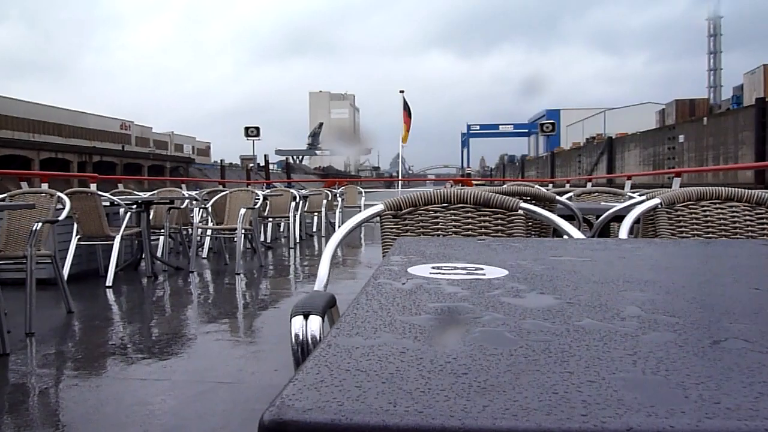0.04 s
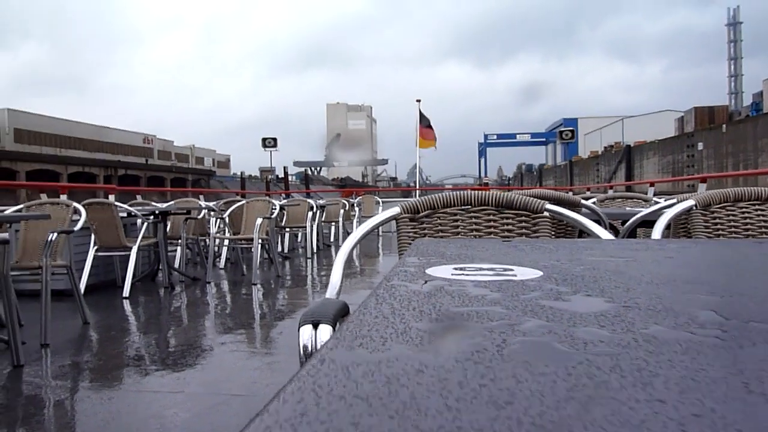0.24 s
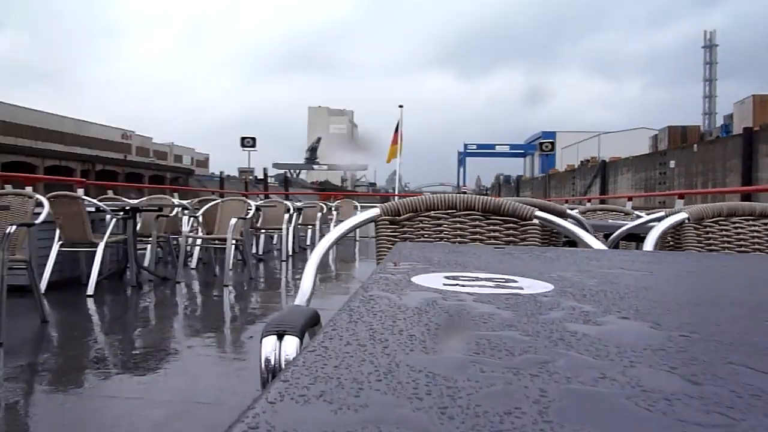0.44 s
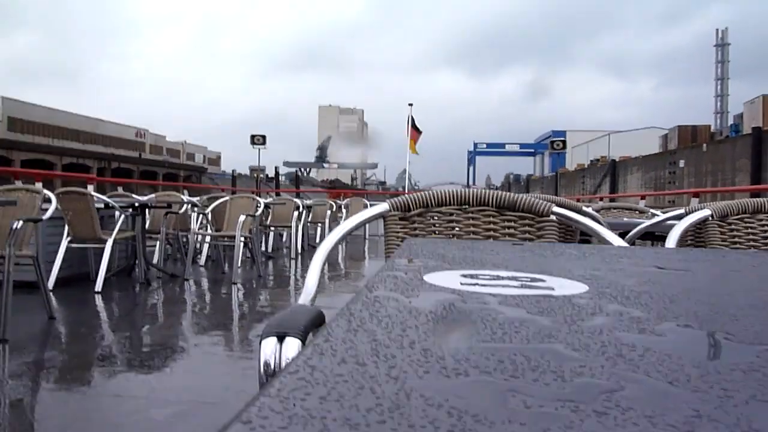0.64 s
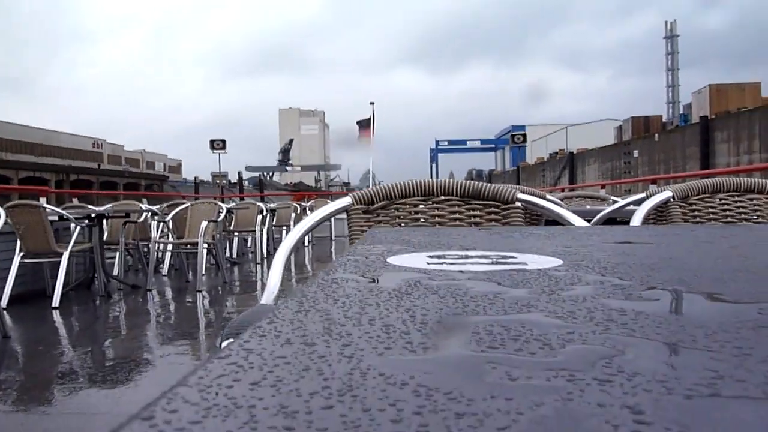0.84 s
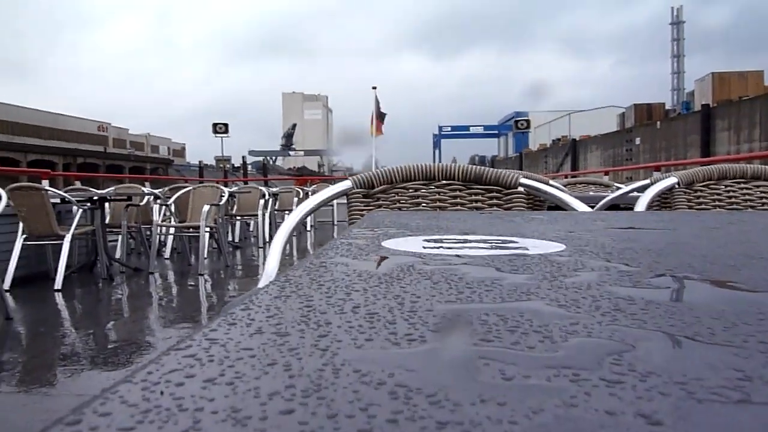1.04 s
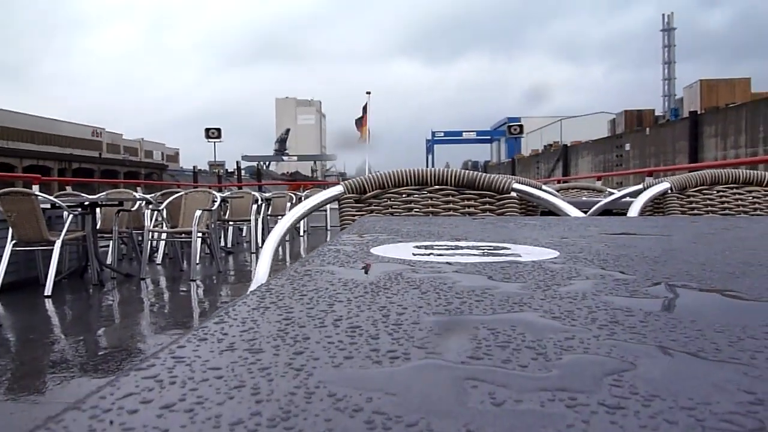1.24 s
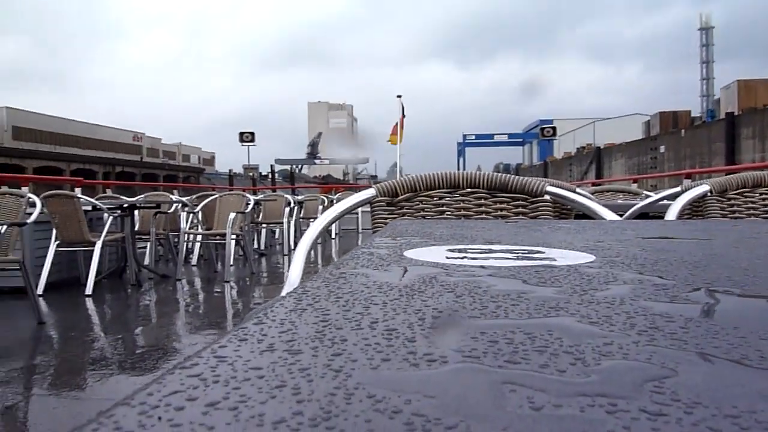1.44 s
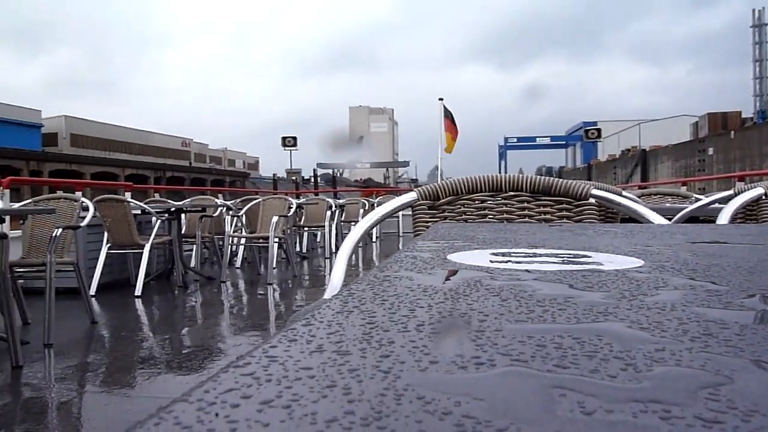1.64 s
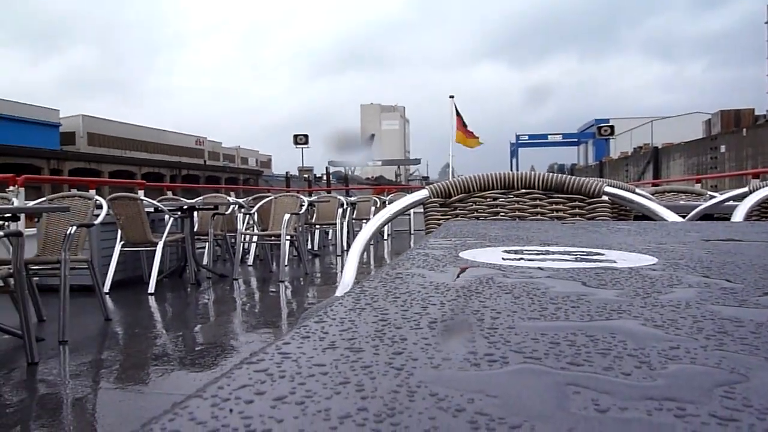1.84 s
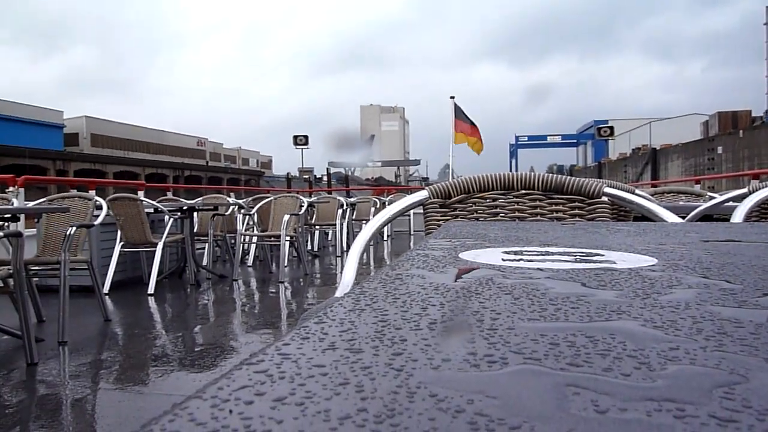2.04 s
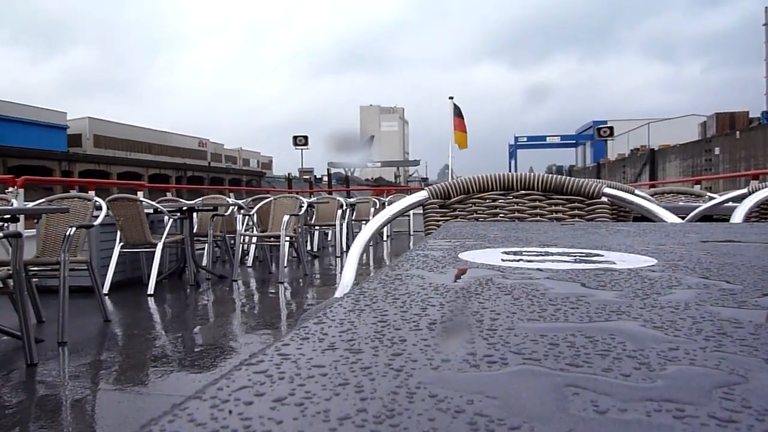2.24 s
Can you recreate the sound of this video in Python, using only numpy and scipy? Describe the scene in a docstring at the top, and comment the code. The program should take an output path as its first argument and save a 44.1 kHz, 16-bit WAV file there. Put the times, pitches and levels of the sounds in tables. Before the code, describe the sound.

Boat engine humming steadily on an open deck, with wet table scrapes and wind buffeting the microphone

```python
"""After a moment of silence the open deck of a tour boat cuts in: wavering engine tones, deck rumble, hissing wash.
At once the microphone is slid over a wet table: noise and random grit make the scrape, resonant bursts the ticks.
Then low thumps and bass noise make wind buffet mainly the right side, while the boat briefly sounds quieter.
A click, a duller rub and a faint ring follow, and near the end comes one short rising hoot, a tone with its octave."""
import sys
import numpy as np
from scipy.fft import rfft, irfft, next_fast_len
from scipy.io import wavfile
from scipy.ndimage import map_coordinates

SR = 44100
rng = np.random.default_rng(int(sys.argv[2]) if len(sys.argv) > 2 else 0)


def digitize_waveform(pressure):
    """Quantize a signal to 16-bit integers and store it at the path in sys.argv[1].

    Rows of a 2-D input are taken as channels; values are limited to [-1, 1].
    """
    field = np.atleast_2d(pressure).T
    bounded = np.clip(field, -1, 1)
    quanta = np.round(bounded * 32767).astype(np.int16)
    wavfile.write(sys.argv[1], SR, quanta)


N = 100592  # length in samples

FIRING_HZ = 77.6  # how often the engine fires


def amp(db):
    """Turn decibels into a gain."""
    return 10 ** (np.asarray(db) / 20)


def unit(x):
    """Scale a sound to an rms of 1."""
    return x / np.sqrt(np.mean(x ** 2) + 1e-20)


def pan(db):
    """Left and right gains that differ by db; above zero, the left is louder."""
    return amp(np.array([[db], [-db]]) / 2)


def along(points, hz):
    """Read a curve of (Hz, value) points on a logarithmic pitch axis."""
    point_hz, values = np.transpose(points)
    return np.interp(np.log(hz + 1), np.log(point_hz + 1), values)


def clock():
    """Time of every sample in seconds."""
    return np.arange(N) / SR


def curves(rows):
    """One curve over time for each column after the time column."""
    times, *columns = np.transpose(rows)
    return [np.interp(clock(), times, column) for column in columns]


def wobble(rate):
    """A smooth random curve through rate random points a second."""
    return map_coordinates(rng.standard_normal(512), [clock() * rate], mode="wrap")


def filtered(x, response):
    """Filter x with a gain that depends on frequency."""
    padded = next_fast_len(N + SR // 2)  # extra room keeps the end from wrapping to the start
    hz = np.fft.rfftfreq(padded, 1 / SR)
    return irfft(rfft(x, padded) * response(hz), padded)[..., :N]


def spread(pair, gain):
    """Mix two unrelated signals into coloured stereo of rms 1: alike in the low mids, unrelated in the treble."""
    # how alike left and right are: pitch_hz, likeness [0 to 1]
    likeness = [(30, 0.5), (60, 0.43), (130, 1), (290, 1), (640, 1), (1410, .8), (3100, 0.42), (6820, 0.13),
                (15000, 0.08)]

    def angle(hz):
        return np.arccos(np.clip(along(likeness, hz), -.99, .99)) / 2

    mid, side = filtered(pair, lambda hz: gain(hz) * [np.cos(angle(hz)), np.sin(angle(hz))])
    return unit(np.array([mid + side, mid - side]))


def rush(spectrum):
    """Stereo noise of rms 1 whose colour follows the spectrum."""
    return spread(rng.standard_normal((2, N)), lambda hz: amp(along(spectrum, hz)))


def strike(start, attack, t60):
    """Loudness of a blow: a quick rise, then an exponential fall of 60 dB in t60 seconds."""
    t = np.maximum(clock() - start, 0)
    return (1 - np.exp(-t / attack)) * np.exp(-np.log(1000) * t / t60)


def engine():
    """The hum of engine and drive: steady tones that waver slightly in level and phase."""
    # tones of the engine and drive: pitch_hz, level_db [before the pan and the boat's dips]
    tones = [(77.7, -33), (155.3, -37.5), (226.4, -26), (354, -44.5), (399, -46), (436, -42), (600, -44.5),
             (690, -62), (798, -51), (944.6, -53.5), (2018, -55)]
    waver_db, waver_rad = 1.5, 0.056  # the phase waver is for a tone at the firing rate
    hum = np.zeros(N)
    for hz, db in tones:
        level = amp(db + waver_db * wobble(8.79))
        phase_waver = waver_rad * np.sqrt(hz / FIRING_HZ) * wobble(6.06)  # higher tones waver more
        phase = 2 * np.pi * (hz * clock() + rng.random()) + phase_waver
        hum += level * np.sin(phase)
    return np.sqrt(2) * hum * pan(-1.8)


def sliding(strength, spectrum, side_db):
    """Sliding friction: steady hiss mixed with tiny catches of grit."""
    grit_per_s, grit_share = 500, 0.32  # share of the power
    strength_db, = curves(strength)
    catches = rng.random(N) < grit_per_s / SR
    grit = unit(rng.standard_normal((2, N)) * catches)
    hiss = rng.standard_normal((2, N))
    friction = np.sqrt(grit_share) * grit + np.sqrt(1 - grit_share) * hiss
    coloured = spread(friction, lambda hz: amp(along(spectrum, hz)))
    return amp(strength_db + 0.88 * wobble(62.1)) * coloured * pan(side_db)


def table_scrape():
    """The first slide over the wet table: bright friction, slightly to the left."""
    # strength of the scraping: time_s, level_db [before flutter and pan]
    scrape_level = [(.22, -39), (.29, -40.5), (.35, -32.5), (.45, -38.5), (.5, -30.5), (.55, -33.5),
                    (.61, -36), (.66, -46), (.72, -50)]
    # colour of the scraping: pitch_hz, density_db [per Hz, relative]
    scrape_colour = [(150, -14), (500, -1), (1200, 2.5), (2200, -8.5), (3700, -0.5), (5500, -2.5),
                     (9000, -4.5), (16000, -13)]
    return sliding(scrape_level, scrape_colour, 2)


def ticks():
    """Ticks, clicks and one faint ring: noise bursts through one resonance each, unrelated left and right."""
    # ticks, clicks and, last, the narrow ring: start_s, level_db [before envelope and pan], centre_hz,
    # width_octaves [from centre to half gain], t60_s [time to fall 60 dB], left_over_right_db
    catches = [(.336, -32, 3500, 0.28, 0.13, 7), (0.375, -36, 3500, 1, 0.027, 3),
               (0.4801, -24.5, 1700, 0.76, 0.034, 8), (.4806, -23, 7560, 0.71, 0.038, 9),
               (.520, -25, 3500, 0.44, 0.071, 12), (0.542, -24, 3300, 0.38, 0.022, 10),
               (.611, -38, 4000, 0.96, 0.034, 4), (.9800, -23.5, 7160, 0.31, 0.013, -2.5),
               (0.981, -20.5, 1980, 0.49, 0.019, 0), (1.076, -28.5, 3140, 0.33, 0.045, -4),
               (1.191, -45, 2550, 0.069, 0.53, 9)]
    attack_s = 0.00068
    out = np.zeros((2, N))
    for start, db, centre, width, t60, side_db in catches:
        noise = rng.standard_normal((2, N))
        burst = unit(filtered(noise, lambda hz: 1 / (1 + (np.log2((hz + 1) / centre) / width) ** 2)))
        out += amp(db) * strike(start, attack_s, t60) * burst * pan(side_db)
    return out


def buffets():
    """Strong puffs of wind on the microphone: low thumps with an overtone, sagging in pitch."""
    # puffs: peak_s, level_db [tone amplitude before the pan], pitch_hz [at the peak],
    # half_length_s [from the peak to 1/e]
    puffs = [(0.631, -26.5, 135, 0.015), (0.653, -20.5, 178.7, .018), (0.743, -20, 100, .011),
             (0.748, -22.5, 240, 0.0066), (0.791, -22.5, 148, 0.02), (0.935, -21.5, 205, .009),
             (0.968, -17.5, 112, .01), (1.006, -24, 150, 0.0066)]
    sag_oct_per_s = 4
    overtone, overtone_db = 2.2, -8.5  # times the pitch; level against the main tone
    out = np.zeros(N)
    for peak, db, hz, length in puffs:
        t = clock() - peak
        pitch = hz * 2 ** (-sag_oct_per_s * np.clip(t, -2 * length, 2 * length))
        phase = 2 * np.pi * (np.cumsum(pitch) / SR + rng.random())
        thump = np.sin(phase) + amp(overtone_db) * np.sin(overtone * phase)
        out += amp(db) * np.exp(-(t / length) ** 2) * thump
    return out * pan(-7.5)


def wind():
    """Turbulence at the microphone ports: bass noise, unrelated left and right, stronger on the right."""
    # strength of the wind: time_s, level_db [before the pan]
    wind_level = [(.22, -41), (.45, -45), (.55, -37), (.61, -28), (.65, -20.5), (.7, -31.5), (.76, -26),
                  (.85, -28.5), (.91, -29.5), (.955, -24.5), (1.03, -34), (1.1, -38), (1.17, -33),
                  (1.24, -41), (1.32, -32), (1.42, -51), (1.65, -56), (1.85, -36), (2.05, -52), (2.28, -38)]
    # colour of the turbulence: pitch_hz, density_db [per Hz, relative]
    turbulence = [(20, -12), (45, -7), (90, 3.5), (160, 2), (250, 0.5), (380, -6), (600, -15.5),
                  (1000, -31), (2500, -47.5)]
    wind_db, = curves(wind_level)
    eddies = unit(filtered(rng.standard_normal((2, N)), lambda hz: amp(along(turbulence, hz))))
    return amp(wind_db) * eddies * pan(-5.5)


def dull_rub():
    """A second rub against the table: friction with less treble, clearly to the left."""
    # strength of the rub: time_s, level_db [before flutter and pan]
    rub_level = [(.99, -78), (1.02, -48), (1.06, -40), (1.08, -33.5), (1.105, -33.5), (1.125, -44),
                 (1.14, -35), (1.18, -52), (1.3, -41), (1.36, -75)]
    # colour of the rub: pitch_hz, density_db [per Hz, relative]
    rub_colour = [(200, -17), (650, 10), (1100, -0.5), (1800, 0), (2900, 2), (4200, -14), (6000, -19),
                  (14000, -36)]
    return sliding(rub_level, rub_colour, 8)


def hoot():
    """A nearly pure tone that steps up in pitch, with a faint octave above it."""
    # path of the hoot: time_s, pitch_hz, level_db [rms of the main tone]
    hoot_path = [(2.03, 405, -57), (2.055, 409.4, -28), (2.087, 410, -30), (2.099, 414.5, -23),
                 (2.128, 421, -23.5), (2.147, 474, -25), (2.165, 488, -25), (2.21, 490, -54)]
    hz, db = curves(hoot_path)
    phase = 2 * np.pi * np.cumsum(hz) / SR
    sounding = (clock() > hoot_path[0][0]) & (clock() < hoot_path[-1][0])
    octave = amp(-22) * np.sin(2 * phase)
    return np.sqrt(2) * sounding * amp(db) * (np.sin(phase) + octave)


def rumble():
    """Engine noise through the deck: low noise that throbs faintly with the firings."""
    # colour of the rumble: pitch_hz, density_db [per Hz, relative]
    rumble_colour = [(20, -25), (40, -7.5), (60, -4), (85, -4), (120, -4), (190, 1), (290, -2), (430, -1.5),
                     (560, -6.5), (800, -11), (1300, -19), (3000, -46)]
    base_db, throb_depth = -26, 0.079  # level before throb, pan and the boat's dips
    throb = 1 + throb_depth * np.sin(2 * np.pi * FIRING_HZ * clock())
    return amp(base_db) * throb * rush(rumble_colour) * pan(-0.1)


def wash():
    """Water and wind around the boat: a broad hiss that flutters a little in level."""
    # colour of the wash: pitch_hz, density_db [per Hz, relative]
    wash_colour = [(200, -4.5), (700, 0), (1400, -0.5), (2100, 0), (3000, -6), (5000, -10), (8500, -14.5),
                   (12000, -21), (16000, -23)]
    base_db, flutter_db = -36.5, 0.89  # level before flutter, pan and the boat's dips
    return amp(base_db + flutter_db * wobble(24.7)) * rush(wash_colour) * pan(0.1)


def scene():
    """The boat and hoot reach the left port a little later; scraping and wind are right at the microphone."""
    # level of the engine tones: time_s, change_db
    hum_level = [(.22, -0.5), (.58, -1.5), (.68, -6), (.82, -11.5), (.9, -1), (.97, -6), (1.13, -1.5),
                 (1.3, -6), (1.45, -1.5), (1.68, 0.5), (1.85, 1.5), (2.0, 0), (2.28, 1.5)]
    # level of the rumble and wash: time_s, change_db
    boat_level = [(.22, 1), (.6, 1), (.69, -9), (.83, -8), (.92, -2), (.98, -7.5), (1.08, -1.5), (1.3, -4),
                  (1.44, -2), (1.66, 0), (2.0, -0.5), (2.28, 0)]
    left_lag_s = .00003
    hum_db, = curves(hum_level)
    boat_db, = curves(boat_level)
    boat = amp(hum_db) * engine() + amp(boat_db) * (rumble() + wash()) + hoot()
    # half the lag delays the left, the other half advances the right
    boat = filtered(boat, lambda hz: np.exp(np.array([[-1j], [1j]]) * np.pi * hz * left_lag_s))
    handling = table_scrape() + dull_rub() + ticks()
    return boat + handling + wind() + buffets()


def record(dry):
    """Silence, then an abrupt opening; nothing is kept above the band limit."""
    start_s, rise_s, top_hz = .2165, 0.0021, 15800
    opening = np.clip((clock() - start_s) / rise_s, 0, 1)
    return filtered(dry * opening, lambda hz: hz < top_hz)


dry = scene()
out = record(dry)
digitize_waveform(out)
```